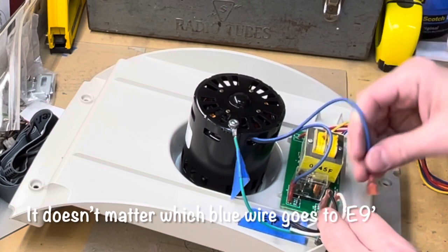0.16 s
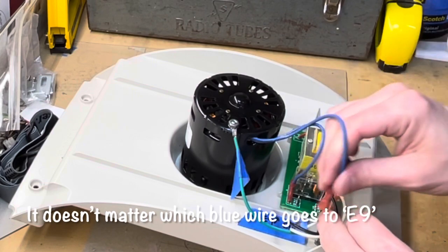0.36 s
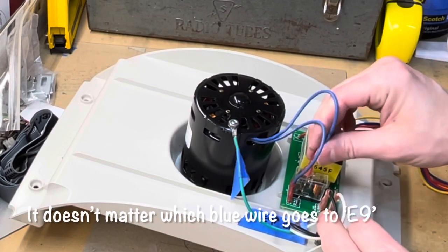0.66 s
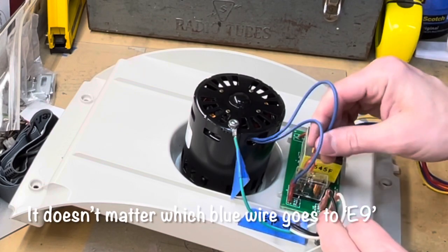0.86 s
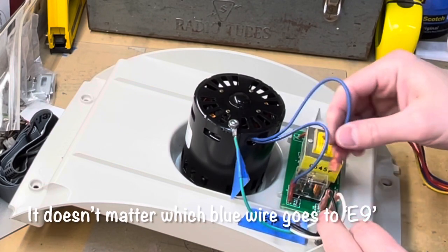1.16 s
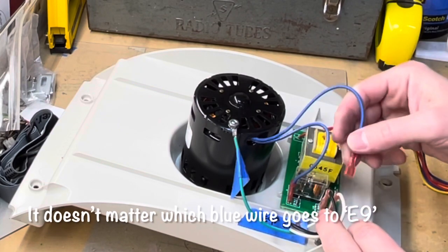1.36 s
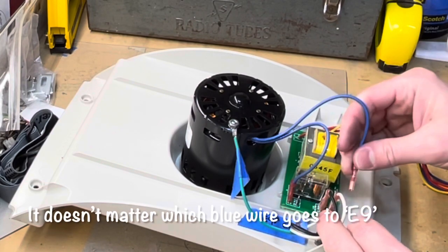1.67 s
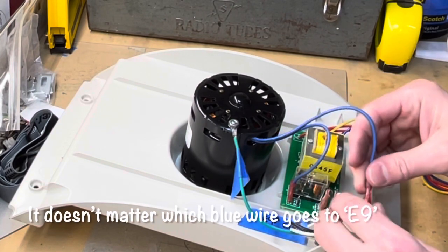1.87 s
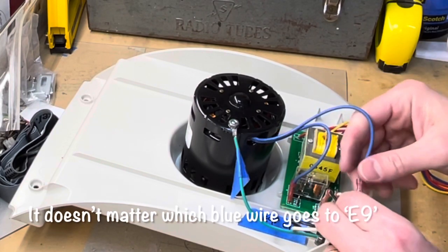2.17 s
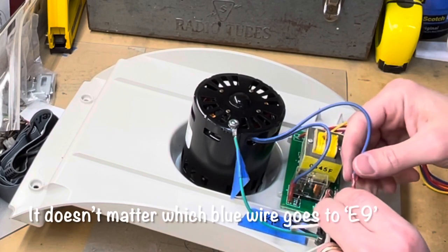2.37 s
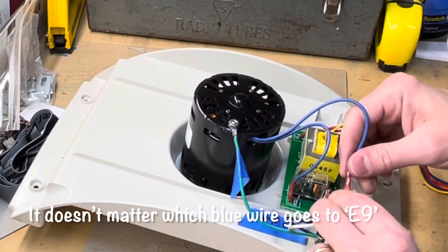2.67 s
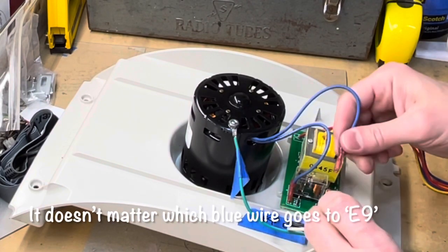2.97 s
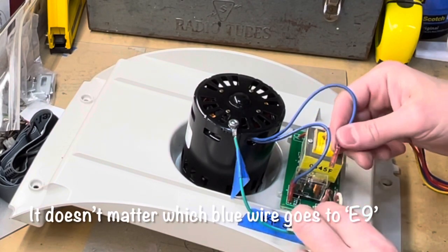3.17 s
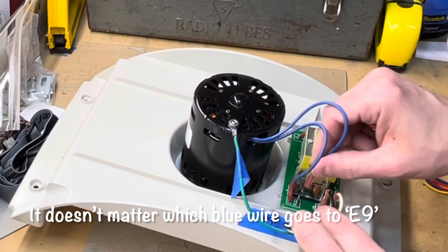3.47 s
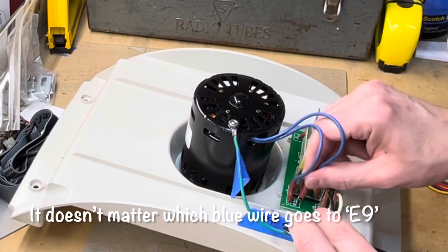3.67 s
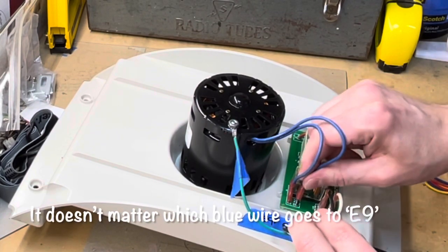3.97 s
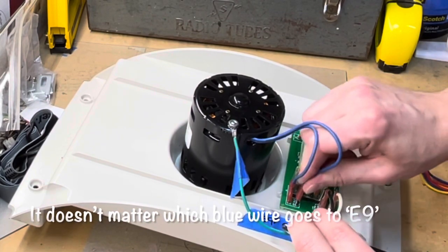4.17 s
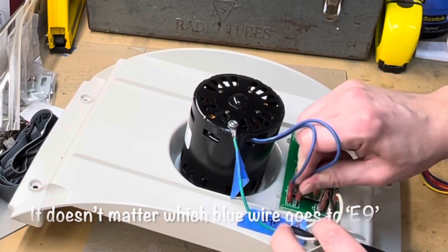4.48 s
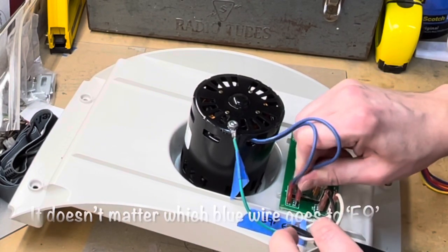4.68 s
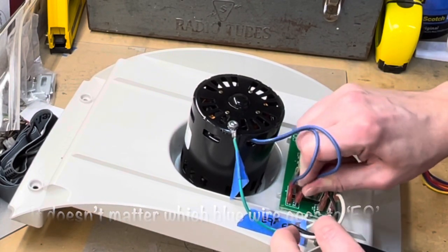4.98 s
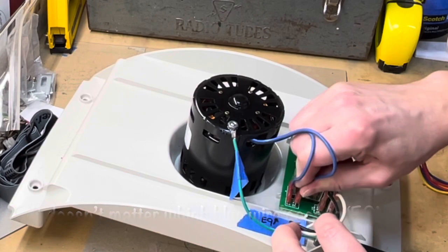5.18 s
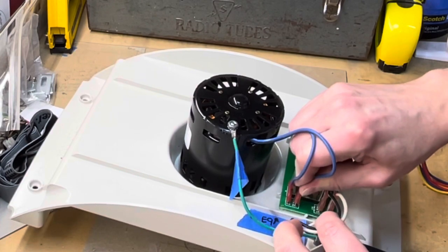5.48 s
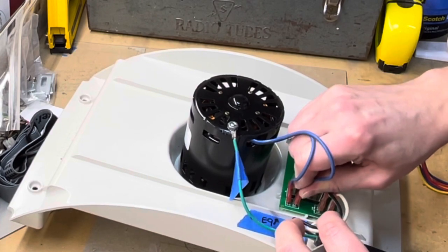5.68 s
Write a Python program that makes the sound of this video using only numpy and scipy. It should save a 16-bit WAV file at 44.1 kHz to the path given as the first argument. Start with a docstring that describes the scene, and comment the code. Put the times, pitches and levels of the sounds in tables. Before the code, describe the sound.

Small clicks, taps and scrapes as a wire connector is worked onto a circuit board terminal, ending in a sharp snap over faint hum.

```python
"""Seating a spade connector

A spade on a stiff wire feels for its terminal on a circuit board in a plastic fan housing.
Each contact ticks the brass, rattles the board and rings the shell; firm pushes rock it on the bench.
The spade scrapes, pings and at last snaps home, with wire and fingers rubbing in between.
Two close microphone ports hear it all in a small workshop, over a faint ventilation hum."""
import sys
import numpy as np
from scipy import signal
from scipy.fft import rfft, irfft, next_fast_len
from scipy.io import wavfile
from scipy.ndimage import uniform_filter1d

SR = 44100
rng = np.random.default_rng(int(sys.argv[2]) if len(sys.argv) > 2 else 0)


def output_pcm(signal):
    """Save a mono or channel-first signal as 16-bit PCM at the path in sys.argv[1].

    Samples are clipped to [-1, 1] before scaling.
    """
    pcm = np.clip(np.atleast_2d(signal).T, -1, 1) * 32767
    wavfile.write(sys.argv[1], SR, np.round(pcm).astype(np.int16))


N = 257103
RING_T = np.arange(int(.35 * SR)) / SR  # time axis of one hit

# workshop air and microphone hiss: freq_hz, density_db
AIR_SPECTRUM = [(20, -122), (32, -79), (45, -74), (75, -70.5), (110, -74), (135, -79.5), (190, -87.5),
                (330, -90), (560, -97), (900, -104), (1300, -110.5), (3700, -120), (5400, -114),
                (6500, -112), (8000, -115), (9500, -120), (12000, -130)]
# the air's mid and side, nearly mono in the bass: freq_hz, gain_db
AIR_MID_EQ = [(100, -0.5), (400, 0.0), (800, -4.0)]
AIR_SIDE_EQ = [(60, -31.0), (120, -7.5), (220, -3.0), (700, -0.5)]
# ventilation tones and a faint electrical whine: pitch_hz, width_hz, level_db
HUM_TONES = [(106.8, 11, -58.5), (147.3, 12, -65), (436, 22, -71.5), (724, 50, -86), (1005, 90, -82),
             (1820, 200, -93.5), (2030, 50, -94.5), (4460, 120, -96.5), (5440, 190, -90.5),
             (6470, 420, -84.5)]
# tone of the room tail: freq_hz, gain_db
ROOM_EQ = [(100, -15.0), (600, -5.5), (2000, -6.0), (6000, -5.5), (11000, -16.0)]
# the microphone port peaks near 10 kHz, then falls away: freq_hz, gain_db
MICROPHONE_EQ = [(7800, -1.5), (8700, 1), (9600, 3.5), (11200, -2), (12000, -13), (13000, -28),
                 (14000, -32), (16000, -39)]

# modes of the plastic housing: pitch_hz, gain_db, undamped_t60_s, lean_share
HOUSING_MODES = [(197.3, -12, 0.28, -0.72), (343, -18, 0.103, -1.35), (420, -3, 0.041, -0.35),
                 (556, -3, 0.074, -1.7), (584.6, 3, 0.093, -1.3), (601.4, -8, 0.22, 0.071),
                 (713.5, -9, 0.12, 0.46), (755.4, -1, 0.1, 0.6), (856, -21, 0.12, -0.5),
                 (945, -13.5, 0.076, 0.77), (1004, -12, 0.17, -0.81)]
# modes of the circuit board with its parts: pitch_hz, gain_db
BOARD_MODES = [(1025, -6.5), (1110, -5.5), (1280, 2.5), (1335, 5), (1770, 7.5), (1895, 4.5), (1975, 2),
               (2280, -3), (2650, -2), (2830, -3.5), (3980, -1), (4680, -1), (5410, -14), (6160, 1)]
# crowded weak modes of the housing: freq_hz, gain_db
KNOCK_EQ = [(120, -11.5), (250, -18), (420, 3.5), (510, 2.5), (800, 6.5), (1050, 1), (1400, -10),
            (2200, -57), (4000, -31.5)]
# crowded short modes of the board: freq_hz, gain_db
RATTLE_EQ = [(300, -15), (800, -4.5), (1050, 6.5), (1300, 5.5), (1580, -1.5), (1800, 10), (2000, 2.5),
             (2150, -2), (2700, -4.5), (3200, -4.5), (3700, -6.5), (4600, -12.5), (6000, -16), (12000, -31)]
# insulation rubbing the housing: freq_hz, gain_db
RUB_EQ = [(250, 7.5), (480, 4), (590, 12.5), (670, 6), (750, 12.5), (880, -1), (1300, 4.5), (1600, 0),
          (1850, 4.5), (2300, -3), (3500, -6), (8000, -12.5), (12500, -46)]
# fingertips sliding on insulation: freq_hz, gain_db
SKIN_EQ = [(1500, -14), (4500, -5.5), (8500, -4), (10300, -9), (11500, -2.5), (13000, -13)]
# the brass terminal's tick: freq_hz, gain_db
TICK_EQ = [(1500, -10.5), (2500, -4), (4300, 2), (5600, 11), (7000, 6), (8200, -1), (9200, 10), (10200, -8),
           (11200, 13), (12000, 9), (13000, 3), (16000, -20)]
# the spade's rasp: freq_hz, gain_db
SCRAPE_EQ = [(1500, -9), (2300, 3), (3700, -5), (5100, -2), (6500, -4), (8000, -4), (9500, -7), (11500, 8),
             (13000, 1), (16000, -23)]
# the crack of the spade's spring: freq_hz, gain_db
SNAP_EQ = [(700, -7), (1500, -6), (2700, 3.5), (3400, -6.5), (4500, -2.5), (7500, -3), (9200, 3.5),
           (10300, -0.5), (12000, 16), (13200, 10), (16000, -3.5)]

# insulation squeaks between the fingers: start_s, length_s, level_db, first_hz, last_hz, width_hz
SQUEAK_CUES = [(0.638, 0.13, -77, 2370, 2390, 60.6), (1.625, 0.19, -79, 4620, 5460, 700),
               (1.778, 0.087, -75.5, 2530, 2800, 502)]
# the wire slides over the housing and through the fingers: start_s, length_s, rub_db, skin_offset_db
STROKE_CUES = [(0.279, 0.34, -65, -7), (0.736, 0.048, -66.5, -5.5), (0.992, 0.044, -67, -8),
               (1.665, 0.25, -71.5, -2), (2.192, .03, -68.5, -5), (2.616, 0.092, -65, -5.5),
               (2.963, 0.15, -60, -8.5), (3.127, 0.26, -65, -15), (3.456, 0.3, -62, -6.5),
               (3.975, 0.07, -61.5, -9), (4.197, 0.2, -61, -5), (4.415, 0.35, -63, -6.5),
               (4.721, 0.046, -58, -20.5), (4.978, 0.026, -65, -6.5), (5.34, 0.21, -61, -8.5),
               (5.567, 0.23, -67.5, -5.5), (5.708, .14, -55, -6.5)]
# firm pushes rock the housing: start_s, level_db, pitch_hz, t60_s
PUSH_CUES = [(3.614, -38, 115.5, 0.28), (4.291, -45.5, 196, 0.25), (4.668, -29.5, 116, 0.16),
             (5.51, -32, 115, 0.2)]
# a fingertip or the wire bumps the housing: start_s, level_db, contact_ms
BUMP_CUES = [(0.478, -50.5, 2), (.540, -47, 0.67), (.558, -54, 0.72), (.578, -51, 1.8), (.592, -50, 1.5),
             (2.629, -61, 2.2), (2.969, -56, 2.3), (3.08, -57.5, 11), (3.535, -57, 1.2), (3.553, -56, 0.89),
             (3.727, -50, 3.1), (3.7464, -50.5, 3.6), (4.34, -57.5, 3.7), (4.911, -61, 2.3),
             (5.149, -60, 2.6), (5.329, -59.5, 2.9)]
# the spade scrapes along the terminal: start_s, length_s, brass_db, board_db
SCRAPE_CUES = [(0.461, 0.019, -65, -53), (0.535, 0.025, -81, -59), (3.627, 0.037, -62, -61),
               (3.701, 0.042, -54.5, -51.5), (4.166, 0.012, -73, -56), (4.183, 0.024, -74, -57),
               (4.276, 0.022, -48, -59), (4.312, 0.021, -53.5, -70), (4.625, 0.037, -57.5, -84),
               (4.67, 0.033, -68, -60)]
# brass skids on brass, too lightly to move the housing: start_s, level_db, slip_ms
TICK_CUES = [(2.4847, -54, 1.2), (3.728, -56.5, 3.5), (4.294, -55, 1.4), (4.653, -48, 3), (4.844, -60, 2.2),
             (5.465, -56, 3.5), (5.516, -49, 0.94)]
# the connector knocks the board: start_s, board_db, housing_offset_db, brass_offset_db, slip_ms
KNOCK_CUES = [(0.0933, -60.5, -3.5, -19, 1.7), (0.296, -59.5, -15, -10.5, 1.16), (.419, -54, -5, -27, 5),
              (0.4438, -43, -13, -13, 1.2), (0.534, -48, 1.5, -10, 0.6), (2.916, -63.5, 5.5, -18, 1.5),
              (2.959, -55.5, -0.5, -6, 1.2), (3.409, -61.5, 9.5, -22, 1.7), (3.492, -64.5, 3, -1.5, 3.9),
              (3.6062, -42, 4.5, -12, 1.56), (3.657, -45.5, 1.5, -5.5, 0.88), (3.708, -56, 7.5, -0.5, 2.3),
              (4.184, -45, -3.5, -28, 1.17), (4.373, -64.5, 6, -14, 4.5), (4.6574, -41, 9, -28, 0.8),
              (4.694, -51.5, 7.5, -7.5, 2.17), (4.8196, -57.5, 0.5, -5.5, 2.54),
              (5.2135, -41, 1.5, -9, 1.8), (5.2675, -49.5, 4, -12, 1.74), (5.354, -66, 6, -8, 3.3),
              (5.4965, -41, 10, 0.5, 7), (5.509, -37, -2.5, -12, 0.6), (5.678, -63, -5, -21, 3.9)]
# a free edge of the spade pings, tuned by where it is held: start_s, level_db, pitch_hz, t60_s
PING_CUES = [(0.533, -44, 15600, 0.018), (4.293, -58.5, 5050, 0.015), (4.6585, -50.5, 3600, 0.063),
             (4.695, -60.5, 7630, 0.035)]

PORT_LAG_SAMPLES, LOW_CUT_HZ, HIGH_CUT_HZ = 11, 32, 16200
HUM_PITCH_DRIFT, HUM_SWELL_DB = .006, 3
STROKE_ATTACK_S, STROKE_RELEASE_S = 0.019, 0.035
HELD_RUB_DB, HELD_SKIN_DB = -78, -77.5  # the wire stirs a little even when only held
TAPS_PER_S, TAPS_DB = 24, -5  # level against the rub
LEAN_DB, LEAN_DB_PER_DOUBLING = 4.5, 5  # a 1 ms contact leans bright; longer ones lean darker
CROWD_DB, CROWD_T60_S, CROWD_TILT = -7, 0.051, 0.43  # weak housing modes; tilt: dB/octave per dB of lean
GRIP_T60_S = .3  # the hand damps the housing
BOARD_RING_CYCLES = 79  # cycles to fall 60 dB, so high modes die first
TICK_BOARD_DB, TICK_SCATTER_DB = -21, -3  # board rattle and scatter, against the tick
CATCHES_PER_S, CATCH_SCATTER_DB = 3000, 0.5  # stick-slip grains of a scrape
REBOUND_S, REBOUND_DB = .0028, -1.5  # the spade lands again, almost as hard
SNAP_S, SNAP_DB, SNAP_T60_S = 5.5087, -25.5, 0.012  # the spring jumps over the end of the terminal
SEAT_DELAY_S, SEAT_OFFSET_DB = .0022, -4.5  # then hits its stop


def undb(db):
    """Decibels to gain."""
    return 10 ** (np.asarray(db) / 20)


def unit(x):
    """Scale to rms 1."""
    return x / np.sqrt(np.mean(x ** 2))


def colour(x, points):
    """Minimum-phase EQ through (freq_hz, gain_db) points."""
    size = next_fast_len(2 * x.shape[-1])
    size += size % 2
    hz, db = np.transpose(points)
    bin_hz = np.fft.rfftfreq(size, 1 / SR)
    curve_db = np.interp(np.log(bin_hz + 1), np.log(hz), db)
    cepstrum = irfft(np.log(undb(curve_db)))
    cepstrum[1:size // 2] *= 2
    cepstrum[size // 2 + 1:] = 0
    return irfft(rfft(x, size) * np.exp(rfft(cepstrum)))[..., :x.shape[-1]]


def hit(x, db):
    """Give a short sound the energy of 20 ms at this level."""
    return unit(x) * undb(db) * np.sqrt(SR / 50 / x.shape[-1])


def fade(t60):
    """Free decay, 60 dB down after t60 seconds."""
    return np.exp(-np.log(1000) * RING_T / t60)


def burst(t60, stereo=False):
    """Decaying white noise."""
    return rng.standard_normal((2, len(RING_T)) if stereo else len(RING_T)) * fade(t60)


def ports(x, left_db):
    """Mono to stereo: the left port hears it later, and left_db louder than the right."""
    late = np.pad(x, (PORT_LAG_SAMPLES, 0))[:len(x)]
    return np.array([undb(left_db / 2) * late, undb(-left_db / 2) * x])


def add(out, start_s, sound):
    """Drop a sound onto the track."""
    i = int(start_s * SR)
    out[:, i:i + sound.shape[1]] += sound[:, :N - i]


def drift(rate_hz):
    """Smooth random wander at rms 1."""
    hold = int(SR / rate_hz)
    steps = np.repeat(rng.standard_normal(N // hold + 2), hold)
    return unit(uniform_filter1d(steps, hold)[:N])


def noisy_tone(hz, width_hz):
    """A narrow band of noise around a moving pitch."""
    phase = 2 * np.pi * np.cumsum(hz) / SR
    return unit(drift(2 * width_hz) * np.cos(phase) + drift(2 * width_hz) * np.sin(phase))


def ring(modes, scatter_db, detune):
    """Decaying modes; the grip shifts their pitch and strength a little on every hit."""
    hz, db, t60 = np.transpose(modes)[:, :, None]
    strength, shift, sign = rng.standard_normal((3, len(hz), 1))
    waves = np.sin(2 * np.pi * hz * (1 + detune * shift) * RING_T)
    return np.sum(np.sign(sign) * undb(db + scatter_db * strength) * fade(t60) * waves, axis=0)


def driven(force, response):
    """Play a force through a part's stereo response."""
    return signal.fftconvolve(force[None], response, axes=1)[:, :len(force)]


def ventilation():
    """The bed: centred rumble, wavering tones and a faint hiss."""
    white = rng.standard_normal((2, N)) * np.sqrt(SR / 2)
    mid = colour(white[0], AIR_MID_EQ)
    side = colour(white[1], AIR_SIDE_EQ)
    air = colour(np.array([mid + side, mid - side]), AIR_SPECTRUM) * undb(0.096 * drift(1.0))
    tones = 0
    for hz, width_hz, db in HUM_TONES:
        swell = undb(db + HUM_SWELL_DB * drift(2.953))
        tones += swell * noisy_tone(hz * (1 + HUM_PITCH_DRIFT * drift(2)), width_hz)
    return (air + tones) * undb([[0.72], [-0.72]])


def workshop_reverb(dry):
    """Early scatter off the bench and tools, then a faint, dullish room tail."""
    bench, walls = rng.standard_normal((2, 2, len(RING_T))) * (RING_T > .006)  # 6 ms pre-delay
    tail = bench * fade(0.08) + undb(-10.5) * walls * fade(0.17)
    tail /= np.sqrt(np.sum(tail ** 2, axis=1, keepdims=True))
    return signal.fftconvolve(dry, colour(tail, ROOM_EQ), axes=1)[:, :N]


def squeaking():
    """Stiff insulation squeaks, rising in pitch as the wire tightens."""
    t, out = np.arange(N) / SR, 0
    for start, length, db, first_hz, last_hz, width_hz in SQUEAK_CUES:
        progress = np.clip((t - start) / length, 0, 1)
        hz = first_hz + (last_hz - first_hz) * progress
        out += undb(db) * np.sin(np.pi * progress) * noisy_tone(hz, width_hz)
    return ports(out, left_db=4)


def housing(contact_ms):
    """The shell rings up while the contact lasts: short ones sound bright, long ones dark."""
    lean_db = LEAN_DB - LEAN_DB_PER_DOUBLING * np.log2(contact_ms)
    modes = [(hz, db + share * lean_db, t60) for hz, db, t60, share in HOUSING_MODES]
    body = ports(ring(modes, scatter_db=1.8, detune=.012) * fade(GRIP_T60_S), left_db=.8)
    # weak, well damped modes fill the gaps and dry out the knock
    tilted_eq = [(hz, db + CROWD_TILT * lean_db * np.log2(hz)) for hz, db in KNOCK_EQ]
    crowd = colour(burst(CROWD_T60_S, stereo=True), tilted_eq)
    attack = 1 - fade(0.004 * (3 + contact_ms))
    return (unit(body) + undb(CROWD_DB) * unit(crowd)) * attack


def tapping():
    """The wire taps at random, ringing the housing."""
    taps = (rng.random(N) < TAPS_PER_S / SR) * rng.uniform(-0.89, 1, N)
    return unit(driven(taps, housing(contact_ms=2.6)))


def stroke(start, length):
    """Attack, hold and release of one slide of the wire."""
    t = np.arange(N) / SR - start
    return np.clip(t / STROKE_ATTACK_S, 0, 1) * np.exp(-np.maximum(t - length, 0) / STROKE_RELEASE_S)


def sliding():
    """Insulation sticks and slips in dense grains that ring the housing; skin adds a soft hiss."""
    rub_gain, skin_gain = undb(HELD_RUB_DB), undb(HELD_SKIN_DB)
    for start, length, db, skin_offset_db in STROKE_CUES:
        envelope = undb(db) * stroke(start, length)
        rub_gain = np.maximum(rub_gain, envelope)
        skin_gain = np.maximum(skin_gain, envelope * undb(skin_offset_db))
    catches = rng.random(N) < 6000 / SR  # about 6000 a second
    grains = catches * undb(1.4 * rng.exponential(size=N)) * rng.standard_normal((3, N))
    friction = ports(grains[0], left_db=2.0) + grains[1:]
    pressure = undb(1.8 * drift(32))
    rub = unit(colour(friction, RUB_EQ)) * rub_gain
    skin = unit(colour(friction, SKIN_EQ)) * skin_gain
    return pressure * (rub + skin) + undb(TAPS_DB) * tapping() * rub_gain


def rocking():
    """Low thump: the whole housing bounces on the bench after a firm push."""
    out = np.zeros((2, N))
    for start, db, hz, t60 in PUSH_CUES:
        modes = [(hz, 0, t60), (hz * 0.59, -10, t60), (hz * 1.546, -11, t60 / 2)]
        bounce = ring(modes, scatter_db=-3, detune=0.016) * (1 - fade(0.034))
        add(out, start, ports(hit(bounce, db), left_db=3.0))
    return out


def board():
    """A crack, then damped modes over a crowd of short ones, radiating differently to each port."""
    damped = [(hz, db, BOARD_RING_CYCLES / hz) for hz, db in BOARD_MODES]
    modes = np.array([ring(damped, scatter_db=4.5, detune=0.0089) for _ in range(2)])
    crowd = colour(burst(.048, stereo=True), RATTLE_EQ)
    crack = ports(colour(burst(.018), RATTLE_EQ), left_db=0)
    rattle = undb(1.5) * unit(modes) + undb(2) * unit(crowd) + unit(crack)
    return rattle * undb([[0.81], [-0.81]])


def terminal():
    """A sharp brass tick with a very short ring, scattered by the parts around it."""
    click = signal.unit_impulse(len(RING_T))
    direct = ports(undb(-5) * unit(click) + unit(burst(.014)), left_db=1)
    scattered = burst(.06, stereo=True) * (1 - fade(.012))
    return colour(unit(direct) + undb(TICK_SCATTER_DB) * unit(scattered), TICK_EQ)


def scraping():
    """Brass catches on brass in a fast, uneven run that rasps the spade and shakes the board."""
    out = np.zeros((2, N))
    for start, length, brass_db, board_db in SCRAPE_CUES:
        arch = np.sin(np.pi * np.minimum(RING_T / length, 1))
        pressure = np.sqrt(np.maximum(arch, 0))
        accents = undb(CATCH_SCATTER_DB * rng.exponential(size=len(RING_T)))
        grains = accents * rng.standard_normal(len(RING_T))
        catches = rng.random(len(RING_T)) < CATCHES_PER_S / SR
        force = pressure * catches * grains
        spade = colour(burst(0.018, stereo=True), SCRAPE_EQ)
        add(out, start, hit(driven(force, spade), brass_db) + hit(driven(force, board()), board_db))
    return out


def slip(slip_ms, count=48):
    """Contact force: a clean strike is one catch, a long slide a swelling rasp of small ones."""
    force = np.zeros(len(RING_T))
    when, size = rng.random(count), rng.standard_normal(count)
    strike = np.exp(-slip_ms / 3)
    catches = (when * 2 * slip_ms * SR / 1000).astype(int)
    force[catches] = .25 * (1 - strike) * size * np.sin(np.pi * when)
    force[0] = strike
    return force


def rebounding(part, slip_ms):
    """A double hit: the springy spade lands again on a slightly different spot."""
    first, again = (driven(slip(slip_ms), part()) for _ in range(2))
    late = np.pad(again, ((0, 0), (int(REBOUND_S * SR), 0)))[:, :len(RING_T)]
    return unit(first) + undb(REBOUND_DB) * unit(late)


def connector():
    """Knocks layer board, housing and terminal; ticks are mostly terminal, bumps only housing."""
    out = np.zeros((2, N))
    for start, db, housing_offset_db, brass_offset_db, slip_ms in KNOCK_CUES:
        add(out, start, hit(rebounding(board, slip_ms), db))
        add(out, start, hit(housing(slip_ms), db + housing_offset_db))
        add(out, start, hit(rebounding(terminal, slip_ms), db + brass_offset_db))
    for start, db, slip_ms in TICK_CUES:
        add(out, start, hit(rebounding(terminal, slip_ms), db))
        add(out, start, hit(driven(slip(slip_ms), board()), db + TICK_BOARD_DB))
    for start, db, contact_ms in BUMP_CUES:
        add(out, start, hit(housing(contact_ms), db))
    return out


def snap():
    """The dry crack of the spade's spring."""
    return ports(colour(burst(SNAP_T60_S), SNAP_EQ), left_db=2.5)


def spade_spring():
    """The spade pings as it slips off an edge, and snaps hard as it seats."""
    out = np.zeros((2, N))
    for start, db, hz, t60 in PING_CUES:
        ping = fade(t60) * np.sin(2 * np.pi * hz * RING_T)
        add(out, start, ports(hit(ping, db), left_db=8))
    add(out, SNAP_S, hit(snap(), SNAP_DB))
    add(out, SNAP_S + SEAT_DELAY_S, hit(snap(), SNAP_DB + SEAT_OFFSET_DB))
    return out


def scene():
    """Close handling and its room reverb, over the ventilation bed."""
    handling = connector() + scraping() + spade_spring() + rocking() + sliding() + squeaking()
    return handling + workshop_reverb(handling) + ventilation()


def record(dry):
    """Microphone colour, then a low cut and a steep high cut."""
    low_cut = signal.butter(5, LOW_CUT_HZ, "high", fs=SR, output="sos")
    high_cut = signal.ellip(8, .2, 70, HIGH_CUT_HZ, fs=SR, output="sos")
    heard = signal.sosfilt(low_cut, colour(dry, MICROPHONE_EQ))
    return signal.sosfilt(high_cut, heard)


dry = scene()
out = record(dry)
output_pcm(out)
```